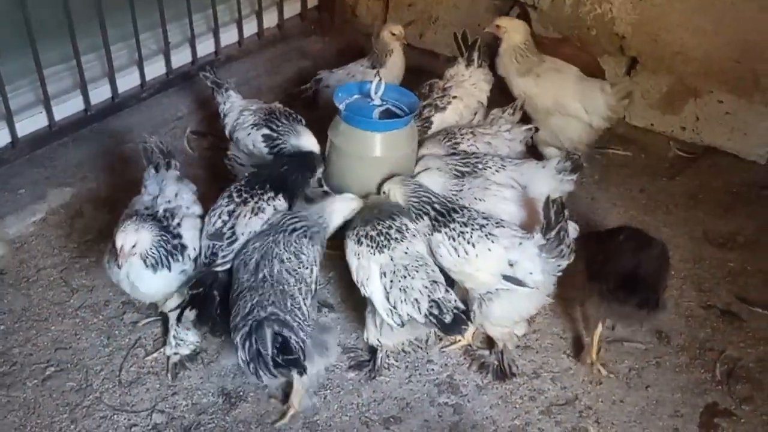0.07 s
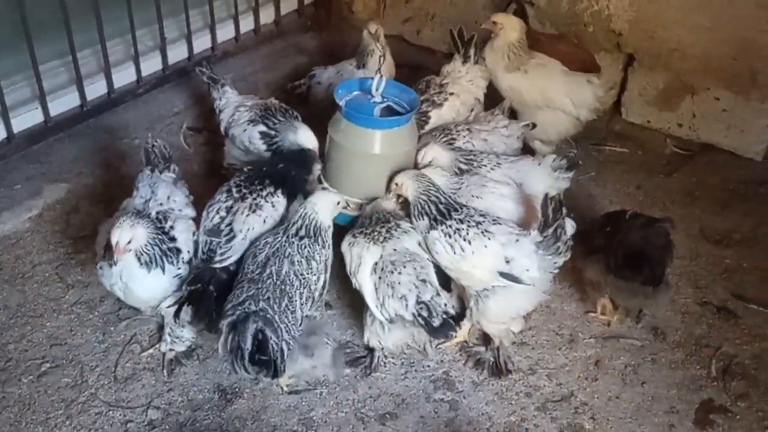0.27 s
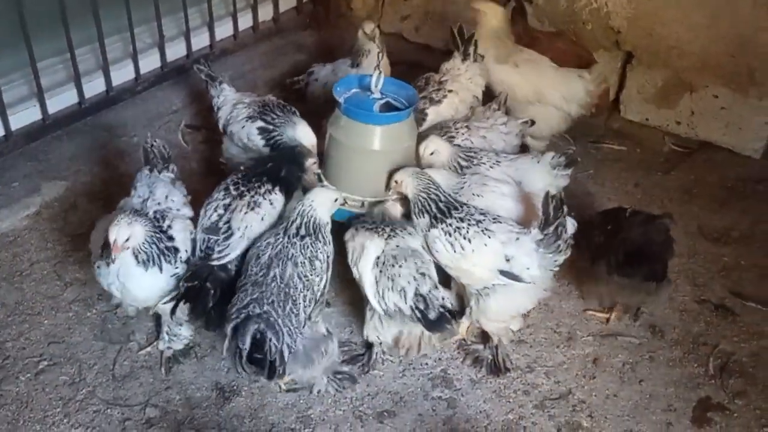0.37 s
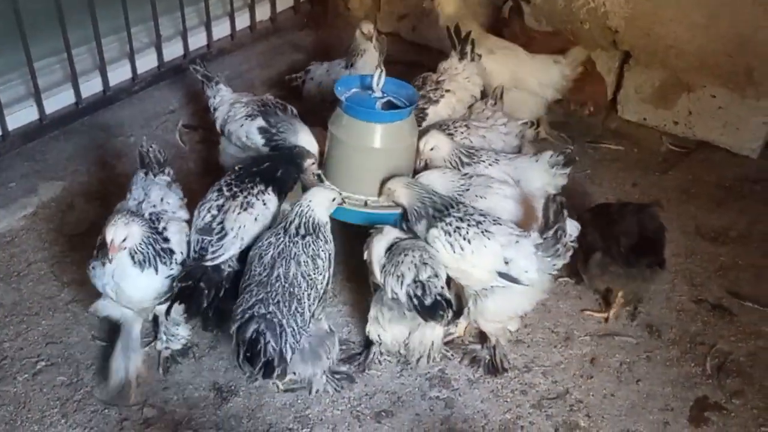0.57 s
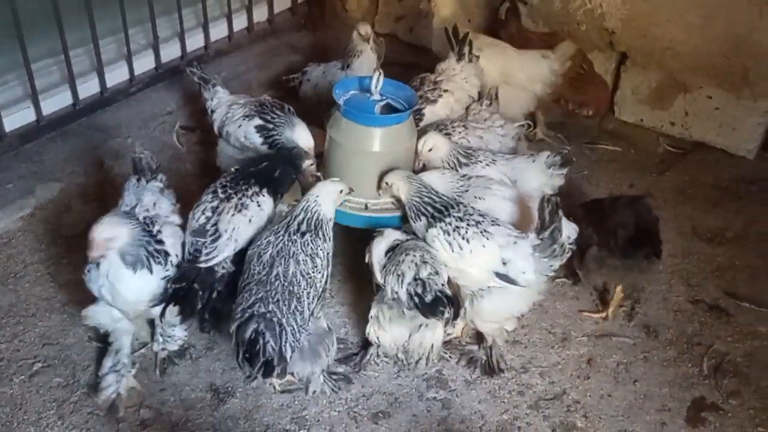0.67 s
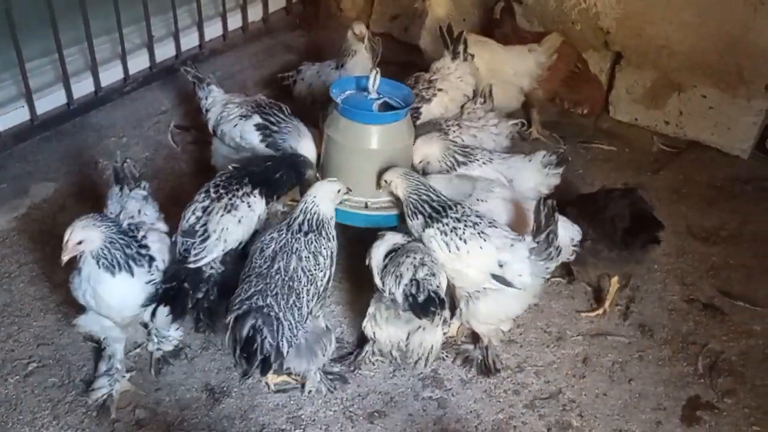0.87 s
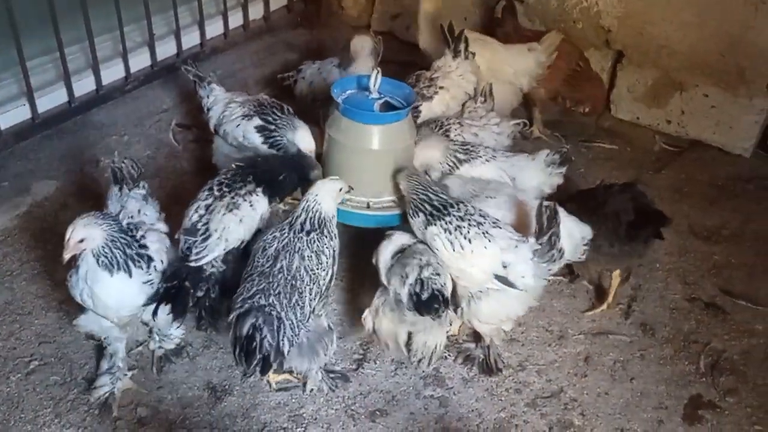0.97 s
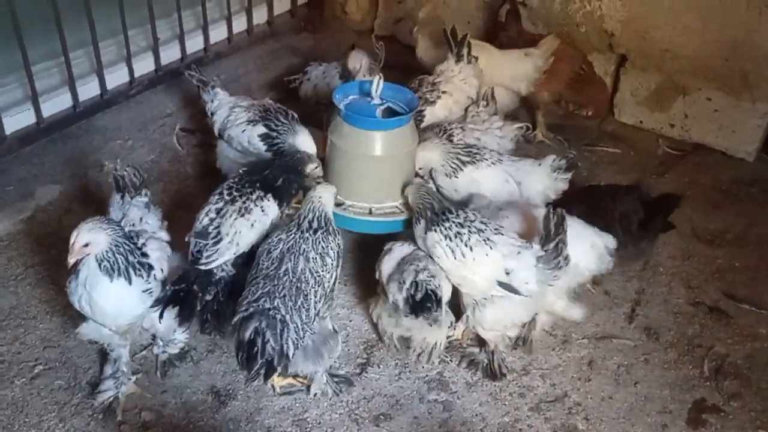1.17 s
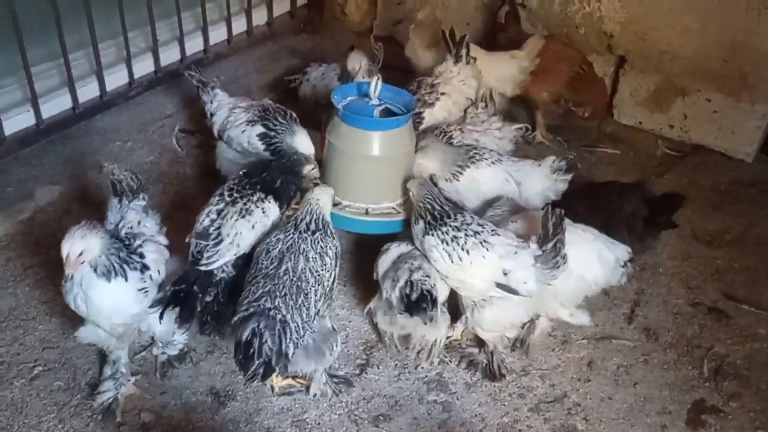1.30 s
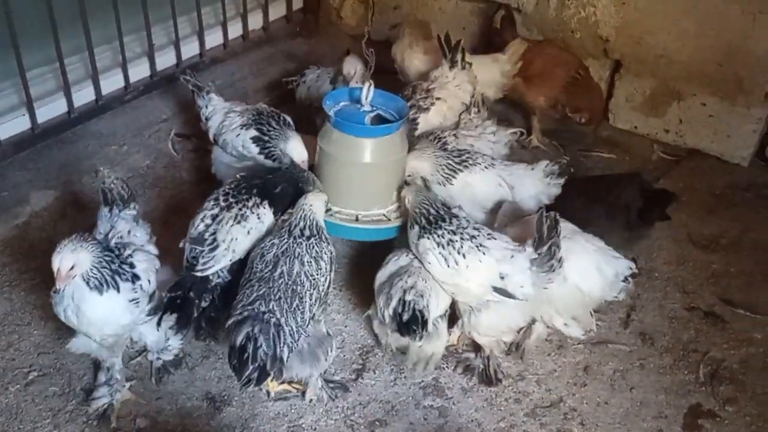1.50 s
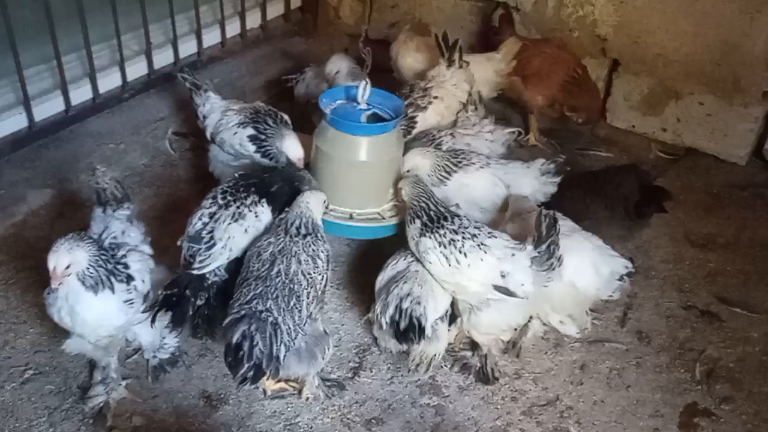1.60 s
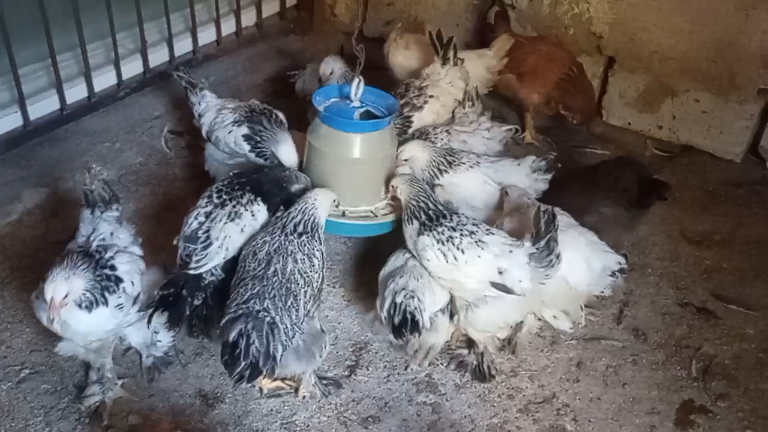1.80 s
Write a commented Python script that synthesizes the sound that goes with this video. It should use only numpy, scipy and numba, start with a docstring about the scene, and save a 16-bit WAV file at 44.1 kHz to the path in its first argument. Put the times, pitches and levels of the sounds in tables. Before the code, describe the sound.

A young chicken squawks once amid soft coos, peeps and pecks at a plastic feeder.

```python
"""Beaks tap and knock a hollow plastic feeder while feet and feathers scuff on concrete.
Young chickens coo softly round it, then one squawks: a thin two-voiced squeal from the syrinx
breaks into a falling rasp, uneven pulses ringing its throat. More coos follow, then peeps and
a farther bird's thin cheeps. The pecking goes on, ringing the rim and rattling the feed,
and the hard walls of the small pen reflect it all over a faint bed of air."""
import sys
import numpy as np
from scipy import signal
from scipy.fft import rfft, irfft
from scipy.io import wavfile
from scipy.ndimage import uniform_filter1d
from numba import njit

SR = 44100
rng = np.random.default_rng(int(sys.argv[2]) if len(sys.argv) > 2 else 0)


def transcribe(signal):
    """Save signal, clipped to [-1, 1], as a 16-bit WAV file at the path in sys.argv[1]."""
    frames = np.atleast_2d(signal).T
    limited = np.clip(frames, -1, 1)
    pcm = np.round(limited * 32767).astype(np.int16)
    wavfile.write(sys.argv[1], SR, pcm)


N = 81585


def undb(db):
    """Decibels to gain."""
    return 10 ** (np.asarray(db) / 20)


def unit(x):
    """Scale to rms 1."""
    return x / np.sqrt(np.mean(x ** 2) + 1e-30)


def times():
    """Time of every sample [s]."""
    return np.arange(N) / SR


def curve(rows, rise_s=0.014, fade_s=0.02):
    """An automation lane for each column after time, then a gate that fades outside their span."""
    points, t = np.array(rows, float), times()
    start, end = points[0, 0], points[-1, 0]
    gate = np.interp(t, [start - rise_s, start, end, end + fade_s], [0, 1, 1, 0])
    return [np.interp(t, points[:, 0], column) for column in points.T[1:]] + [gate]


def walk(rate_hz):
    """Smooth random modulation of rms 1."""
    size = max(int(SR / rate_hz), 1)
    return unit(uniform_filter1d(uniform_filter1d(rng.standard_normal(N), size), size))


def colour(x, gain):
    """EQ by a gain that is a function of frequency."""
    hz = np.maximum(np.arange(len(x) // 2 + 1) * SR / len(x), 1)
    return irfft(rfft(x) * gain(hz), len(x))


def hump(x, hz, octaves):
    """A broad band-pass round one frequency."""
    return colour(x, lambda f: 1 / (1 + (np.log2(f / hz) / octaves) ** 2) ** 2)


@njit
def band(x, hz, width_hz):
    """A swept resonant band-pass, gain 1 at its centre."""
    y, band_state, low_state = np.empty(len(x)), 0., 0.
    for i in range(len(x)):
        g, damping = np.tan(np.pi * min(hz[i], .45 * SR) / SR), width_hz / hz[i]
        v = (band_state + g * (x[i] - low_state)) / (1 + g * (g + damping))
        band_state, low_state = 2 * v - band_state, low_state + 2 * g * v
        y[i] = damping * v
    return y


def ring(modes, t, detune=.012):
    """Decaying modes of struck plastic, tuned a little differently on each hit."""
    out = np.zeros(len(t))
    for hz, db, t60 in modes:
        tone = np.sin(2 * np.pi * hz * (1 + detune * rng.standard_normal()) * t)
        out += undb(db - 60 * t / t60) * tone * rng.choice([-1, 1])
    return out


TREMBLE_HZ, LURCH_HZ, FAST_TREMBLE_HZ = 222, 261, 734  # rates of random pitch modulation


def voice(hz, harmonics_db, rough, tremble_hz):
    """A tone of the syrinx, trembling in level and, by the fraction `rough`, in pitch."""
    phase = 2 * np.pi * np.cumsum(hz * (1 + rough * walk(tremble_hz))) / SR
    tone = sum(undb(db) * np.sin(k * phase) for k, db in enumerate(harmonics_db, 1))
    return unit(tone) * undb(2.0 * walk(90))


def calls(table, harmonics_db, rough, tremble_hz):
    """Tonal bird calls, each riding its own pitch and level curve."""
    return sum(gate * undb(db) * voice(hz, harmonics_db, rough, tremble_hz)
               for hz, db, gate in map(curve, table))


# EQ of the background noise: dark room tone plus a faint, very high hiss (frequency [Hz], gain [dB])
AIR_EQ = [(18, -43), (30, 4.5), (100, 4.5), (492, -1), (639, -2.5), (1290, -1), (2130, -6), (2490, -15),
          (3780, -7), (12600, -23.5), (15500, -18.5)]


def air(level_db=-81.5):
    """A quiet noise bed, dark with a trace of very high hiss, whose level drifts."""
    hz, db = np.array(AIR_EQ).T
    drift = undb(level_db + walk(4.4))
    bed = colour(rng.standard_normal(N), lambda f: undb(np.interp(np.log(f), np.log(hz), db)))
    return drift * unit(bed)


# bright ring of the feeder's rim (frequency [Hz], level [dB], t60 [s])
RIM_MODES = [(1117, -7.5, 0.036), (1237, -13.5, 0.069), (1904, -3.5, 0.029), (2030, -1, 0.0061),
             (3178, 1.5, 0.0095), (3520, 5, 0.012), (4490, -6, 0.029), (5300, -10.5, 0.022),
             (6430, -4.5, 0.019)]
# beak taps and ticks of flung grain (time [s], level [dB], low cut [Hz], high cut [Hz])
TAP_HITS = [(0.0135, -51, 900, 1920), (0.0526, -51.5, 930, 2140), (0.059, -59.5, 1500, 6270),
            (0.096, -56.5, 870, 3000), (0.154, -59, 1190, 8240), (.174, -48, 880, 3650),
            (0.514, -52.5, 1740, 7840), (0.851, -71.5, 2420, 9000), (0.9625, -47.5, 815, 3240),
            (0.9777, -61, 880, 3040), (1.103, -45, 700, 3800), (1.106, -48.5, 3000, 6200),
            (1.1142, -43.5, 900, 2900), (1.1176, -58.5, 1520, 13000), (1.1193, -51, 2800, 5750),
            (1.194, -63.5, 2360, 4200), (1.234, -58.5, 870, 4020), (1.338, -51.5, 1185, 6000),
            (1.3407, -53, 3200, 6090), (1.349, -49.5, 1000, 6470), (1.3537, -58, 2950, 5620),
            (1.377, -62.5, 1460, 4900), (1.3803, -65, 2970, 5350), (1.5274, -58.5, 700, 2500),
            (1.7171, -43.5, 915, 3450)]


def taps(click_s=0.0007, rim_db=-10.5, rattle_db=-14, rattle_s=0.029, grain_db=5, crack_db=-27):
    """Each beak blow clicks, rings the rim and rattles the feed; softer contact dulls it."""
    out, t = np.zeros(2 * N), times()[:SR // 8]
    lead = SR // 500  # room for the EQ to ring ahead of the transient
    for start, db, low_hz, high_hz in TAP_HITS:
        def contact(f):
            """Low and high cut, with a little top-end crack let through."""
            body = 1 / np.sqrt((1 + (f / high_hz) ** 9.3) * (1 + (low_hz / f) ** 10))
            return body + undb(crack_db) * f ** 2 / (f ** 2 + high_hz ** 2)

        grains = rng.standard_normal(len(t)) * undb(grain_db * walk(600)[:len(t)])
        rattle = unit(grains) * np.exp(-t / rattle_s)
        click = rng.standard_normal(len(t)) * np.exp(-t / click_s)
        tap = click + undb(rim_db) * ring(RIM_MODES, t) + undb(rattle_db) * rattle
        tap = colour(np.roll(tap, lead), contact)
        tap /= np.sqrt(np.sum(tap ** 2) / (SR * .002))  # the energy of 2 ms at rms 1
        i = max(int(start * SR) - lead, 0)
        out[i:i + len(t)] += undb(db) * tap
    return out[:N]


# hollow ring of the feeder's tray (frequency [Hz], level [dB], t60 [s])
TRAY_MODES = [(159, -12.5, 0.121), (257, -17.5, 0.15), (332, -1, 0.066), (382, 4, 0.11), (498, -4.5, 0.12),
              (657, -11, 0.04), (854, -19.5, .08)]
# dull bumps on the tray (time [s], ring level [dB], tuning [ratio], thud level [dB], thud centre [Hz])
KNOCK_HITS = [(0.014, -73.5, 0.87, -72.5, 450), (0.172, -71, 1.01, -75, 254), (.963, -56, 1.037, -63, 650),
              (1.034, -73, 0.86, -73.5, 219), (1.061, -69, 0.72, -77, 168), (1.101, -73, 1.026, -60, 810),
              (1.115, -61.5, 1.04, -63.5, 670), (1.151, -77.5, 0.66, -66.5, 300),
              (1.349, -90, 0.92, -72, 830)]


def knocks(attack_s=0.0012, thud_s=0.025, sag_per_s=3.1):
    """A bird bumps the hollow tray: it thuds and rings, sagging in pitch as it relaxes."""
    out, t = np.zeros(2 * N), times()[:SR // 4]
    slowing_time = (1 - np.exp(-sag_per_s * t)) / sag_per_s
    attack = 1 - np.exp(-t / attack_s)
    for start, ring_db, tuning, thud_db, thud_hz in KNOCK_HITS:
        thud = unit(hump(rng.standard_normal(len(t)), thud_hz, octaves=1.1)) * np.exp(-t / thud_s)
        tray = ring([(hz * tuning, db, t60) for hz, db, t60 in TRAY_MODES], slowing_time)
        i = int(start * SR)
        out[i:i + len(t)] += (undb(ring_db) * tray + undb(thud_db) * thud) * attack
    return out[:N]


# foot and feather foley (peak time [s], length [s], level [dB], band centre [Hz])
SCUFF_SWELLS = [(0.053, 0.1, -70, 1120), (0.111, 0.032, -69, 2800), (0.157, 0.068, -65, 1800),
                (0.239, 0.037, -45.5, 8250), (0.396, 0.016, -66.5, 6550), (0.449, .035, -77.5, 149),
                (0.651, 0.021, -71, 4660), (0.741, 0.013, -80, 4190), (0.88, 0.086, -77, 3060),
                (1.007, 0.017, -67.5, 1730), (1.078, 0.054, -71, 5250), (1.122, 0.2, -79.5, 1210),
                (1.239, 0.061, -73, 3650), (1.357, .035, -81, 3960), (1.512, 0.046, -64, 5100)]


def scuffs(grain_db=3):
    """Feet and feathers rub the concrete in short swells of gritty friction."""
    out, t = np.zeros(N), times()
    for at, length, db, hz in SCUFF_SWELLS:
        swell = np.exp(-4 * ((t - at) / length) ** 2)
        grit = rng.standard_normal(N) * undb(grain_db * walk(860))
        out += undb(db) * swell * unit(hump(grit, hz, octaves=1.53))
    return out


# the coo's low register, a curve per call (time [s], pitch [Hz], level [dB])
LOW_REGISTER = [
    [(.118, 707.4, -63), (.138, 668, -59), (.155, 698, -58.5), (.175, 683, -61.5)],
    [(.47, 680, -70), (.49, 690, -68), (.54, 717, -73.5)],
    [(.568, 745, -60.5), (.584, 728, -52), (.618, 739.5, -49), (.64, 728.7, -55.5), (.695, 741, -72.5),
     (.72, 715.4, -52), (.743, 715.7, -41.5), (.757, 671, -58), (.775, 740, -80.5), (.8, 680, -71.5),
     (.835, 653, -69.5)],
]
# the coo's higher, purer register; the last curve is a faint lower tone under the first peep
# (time [s], pitch [Hz], level [dB])
HIGH_REGISTER = [
    [(.083, 901, -68.5), (.11, 857, -61.5), (.16, 919, -61.5), (.195, 890, -74)],
    [(.553, 929, -69), (.568, 924, -64), (.585, 850, -63)],
    [(.635, 870, -61), (.66, 885, -55.5), (.69, 907, -59.5), (.712, 840.5, -57), (.74, 866, -75),
     (.772, 851, -56.5), (.82, 879, -59.5), (.865, 886, -79.5)],
    [(1.038, 1020, -97), (1.048, 1000, -65), (1.075, 960, -81)],
]


def coos(low_cut_hz=620):
    """Soft coos jump between a low and a high register; the throat cuts what lies below the note."""
    low = calls(LOW_REGISTER, harmonics_db=[1.5, -10.5, -32], rough=.015, tremble_hz=TREMBLE_HZ)
    high = calls(HIGH_REGISTER, harmonics_db=[4.5, -35.5], rough=.015, tremble_hz=TREMBLE_HZ)
    return colour(low + high, lambda f: 1 / np.sqrt(1 + (low_cut_hz / f) ** 20))


# thin squeal at the head of the squawk (time [s], pitch [Hz], level [dB])
SQUEAL_CURVE = [(.192, 2643, -79.5), (.203, 3007, -44.5), (.212, 3532, -35), (.218, 3499, -33.5),
                (.224, 3446, -25.5), (.227, 3486, -41), (.255, 3400, -48.5), (.275, 3460, -63.5)]


def squeal(lower_hz=2110, lower_db=-10):
    """Both sides of the syrinx sound: one glides up, the other holds a lower note."""
    hz, db, gate = curve(SQUEAL_CURVE)
    upper = voice(hz, harmonics_db=[0, -27.5], rough=.02, tremble_hz=FAST_TREMBLE_HZ)
    lower = voice(lower_hz, harmonics_db=[0], rough=.02, tremble_hz=TREMBLE_HZ)
    return gate * undb(db) * (upper + undb(lower_db) * lower)


def buzz(pulse_hz=296.8, jitter=.14, scatter_db=1.8, breath=0.31):
    """The drive of the rasp: pulses uneven in timing and strength, mixed with breath."""
    timing, strength = rng.standard_normal((N // 40, 2)).T
    at = (np.cumsum(np.exp(jitter * timing)) * SR / pulse_hz).astype(int)
    pulses = np.bincount(at[at < N], undb(scatter_db * strength[at < N]), N)
    return unit(pulses - pulses.mean()) + breath * rng.standard_normal(N)


# throat formants at rest (centre [Hz], width of each filter stage [Hz], gain [dB])
FORMANTS = [(1648, 995, -2), (2098, 360, 2), (3047, 410, 1), (3890, 620, -4.5), (5140, 230, -11.5),
            (6000, 240, -14.5), (6640, 273, -18), (7800, 1000, -29), (9800, 1100, -29)]
NOTCH_HZ, NOTCH_WIDTH_HZ = 2502, 420.  # the band that the throat's side branch cancels, at rest


def throat(source, shift, treble_db, treble_per_octave=0.17, chest_hz=957., chest_db=-15, leak_db=-15):
    """Moving throat formants and a steady chest resonance shape the buzz."""
    def resonance(centre, width):
        """Two band-passes in series."""
        return band(band(source, centre, float(width)), centre, float(width))

    lower = sum(undb(db) * resonance(hz * shift, width) for hz, width, db in FORMANTS[:2])
    upper = np.zeros(N)
    for hz, width, db in FORMANTS[2:]:
        treble_depth = 1 + treble_per_octave * np.log2(hz / NOTCH_HZ)
        upper += undb(db + treble_db * treble_depth) * resonance(hz * shift, width)
    chest = undb(chest_db) * resonance(np.full(N, chest_hz), width=470)
    # a little midrange passes between the resonances
    leak = undb(leak_db) * colour(source, lambda f: 1 / (1 + (690 / f) ** 4) / (1 + (f / 1710) ** 4))
    return (lower + chest + leak + upper) / np.std(lower)


# falling body of the squawk (time [s], level [dB], screech pitch [Hz], treble lift [dB])
RASP_CURVE = [(.203, -62.5, 2100, 5.5), (.226, -38.5, 2028, -1.5), (.235, -42, 2073, 6.5),
              (.256, -38.5, 1953, 5), (.272, -40.5, 1914, -1.5), (.305, -40, 1860, -2.5),
              (.345, -44.5, 1800, -0.5), (.408, -43, 1732, -5), (.442, -57.5, 1695, -2.5),
              (.458, -56.5, 1675, 6.5), (.467, -50.5, 1666, -3.5), (.489, -49, 1623, 2.5),
              (.51, -59.5, 1573, -4)]


def rasp(rest_hz=1850, formant_tracking=0.55, screech_db=-5, screech_throb_db=4.5, throb_db=2):
    """Uneven pulses and breath ring a throat whose formants sink along with a lurching screech."""
    db, hz, treble_db, gate = curve(RASP_CURVE)
    shift = (hz / rest_hz) ** formant_tracking
    body = throat(buzz(), shift, treble_db)
    screech = voice(hz, harmonics_db=[0], rough=0.13, tremble_hz=LURCH_HZ)
    screech *= undb(screech_throb_db * walk(230))
    cry = body + undb(screech_db) * unit(band(screech, hz, width_hz=1800.))
    cry -= band(cry, NOTCH_HZ * shift, NOTCH_WIDTH_HZ)
    return gate * undb(db + throb_db * walk(244)) * cry / np.sqrt(2)


# short, hard throbs in the squawk (time [s], level [dB], pitch [Hz])
CATCH_HITS = [(.236, -28.5, 2000), (0.252, -33.5, 1750), (0.3002, -39.5, 1547), (0.308, -37.5, 1850),
              (0.3247, -39.5, 1637), (0.3285, -41.5, 1580), (0.3653, -38, 1830), (0.408, -51.5, 1555),
              (0.466, -42, 1500), (0.487, -42.5, 1448)]


def catches(half_length_s=.0032):
    """Brief rough bursts where the strained voice breaks."""
    out, t = np.zeros(N), times()
    for at, db, hz in CATCH_HITS:
        burst = np.exp(-((t - at) / half_length_s) ** 2)
        out += undb(db) * burst * voice(hz, harmonics_db=[0], rough=0.04013, tremble_hz=LURCH_HZ)
    return out


# a quick run of peeps, a curve per call (time [s], pitch [Hz], level [dB])
PEEP_CURVES = [
    [(1.028, 1300, -75), (1.044, 1268, -50.5), (1.056, 1250, -72)],
    [(1.08, 2233, -75), (1.118, 2060, -51.5), (1.145, 2050, -77), (1.168, 2020, -58), (1.178, 2010, -81.5)],
    [(1.188, 1990, -77), (1.2, 2010, -60), (1.215, 2040, -67.5), (1.226, 2050, -78)],
    [(1.238, 2070, -60.5), (1.255, 2072, -69), (1.275, 2028, -59), (1.294, 1960, -68), (1.303, 1950, -70),
     (1.32, 1950, -60), (1.335, 1943, -70)],
]


def peeps():
    """Short, almost pure syrinx notes from the flock."""
    return calls(PEEP_CURVES, harmonics_db=[7, -30.5], rough=.009, tremble_hz=TREMBLE_HZ)


# thin cheeps, a curve per call (time [s], pitch [Hz], level [dB])
CHEEP_CURVES = [
    [(1.435, 3120, -95), (1.446, 3080, -74.5), (1.465, 2580, -86), (1.488, 2485, -73)],
    [(1.551, 2865, -69), (1.57, 2940, -67.5), (1.595, 2570, -70), (1.612, 2545, -84)],
    [(1.796, 3220, -73.5), (1.803, 3210, -72.5), (1.82, 3460, -90)],
]


def cheeps():
    """A bird farther off slides through high notes roughened by a fast tremble."""
    return calls(CHEEP_CURVES, harmonics_db=[0, -18, -31], rough=.04, tremble_hz=FAST_TREMBLE_HZ)


# reverb decay of the pen (frequency [Hz], t60 [s])
PEN_DECAY = [(200, 0.31), (1000, 0.52), (3000, 0.21), (7000, 0.15), (15000, 0.13)]


def pen(x, predelay_s=0.0021, early_db=10.5, early_s=0.015):
    """Dense early reflections from floor and walls, then a tail that dulls."""
    t = times()[:SR // 2]
    hz, t60s = np.array(PEN_DECAY).T
    noise, tail = rng.standard_normal(len(t)), np.zeros(len(t))
    for weights, t60 in zip(np.eye(len(hz)), t60s):
        noise_band = colour(noise, lambda f: np.interp(np.log(f), np.log(hz), weights))
        tail += noise_band * undb(-60 * t / t60)
    early = undb(early_db) * rng.standard_normal(len(t)) * np.exp(-t / early_s)
    impulse = (early + tail) * (t > predelay_s)
    return signal.fftconvolve(x, impulse / np.linalg.norm(impulse))[:N]


def scene():
    """The mono mix: feeder and birds, heard directly and off the walls, over the noise bed."""
    stems = [  # (sound, reverb send [dB])
        (taps() + scuffs(), -6),
        (knocks(), 0.5),
        (coos() + peeps(), -8.5),
        (squeal(), -7),
        (rasp() + catches(), -3.5),
        (cheeps(), -4)]
    direct = sum(stem for stem, _ in stems)
    walls = pen(sum(undb(send_db) * stem for stem, send_db in stems))
    return (direct + walls + air())[None]


def record(dry):
    """The microphone thins the deep bass and dulls the highest treble; the recorder cuts the top."""
    low_cut_hz, shelf_hz, shelf_db, top_hz = 73.15, 10230, -14, 15800

    def microphone(f):
        """A high shelf and a low cut."""
        shelf = undb(shelf_db) + (1 - undb(shelf_db)) / (1 + (f / shelf_hz) ** 16)
        return shelf / np.sqrt(1 + (low_cut_hz / f) ** 4)

    top_cut = signal.ellip(10, .2, 70, top_hz, fs=SR, output="sos")
    return signal.sosfilt(top_cut, colour(dry[0], microphone)[None])


dry = scene()
out = record(dry)
transcribe(out)
```